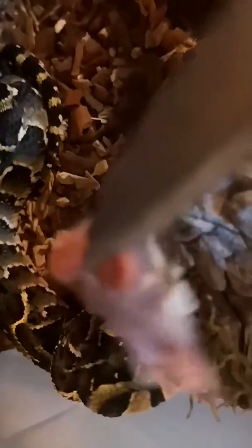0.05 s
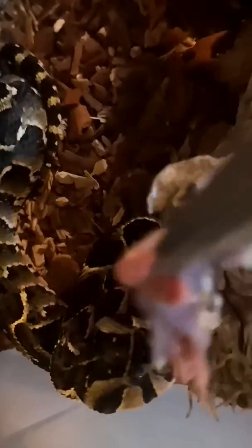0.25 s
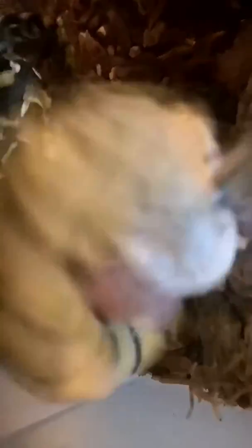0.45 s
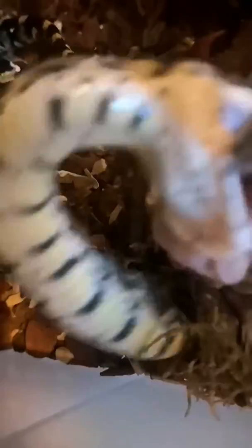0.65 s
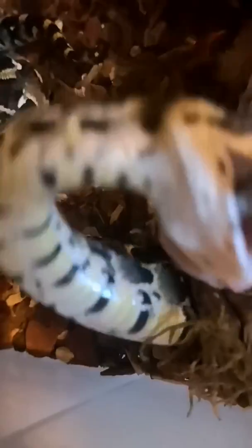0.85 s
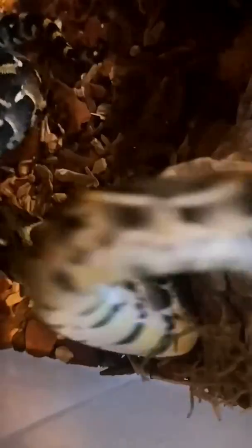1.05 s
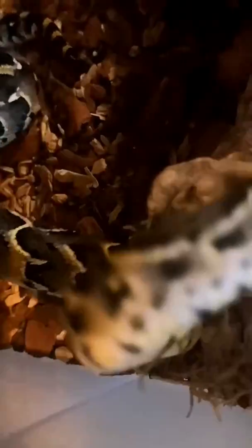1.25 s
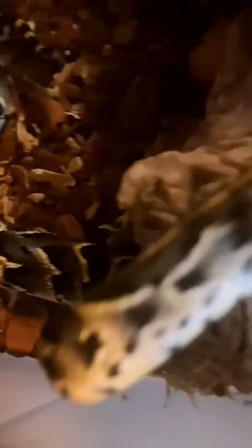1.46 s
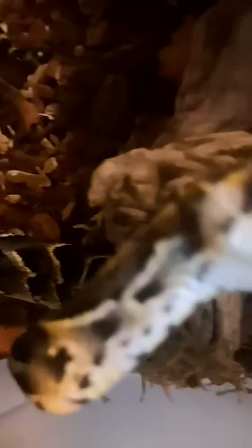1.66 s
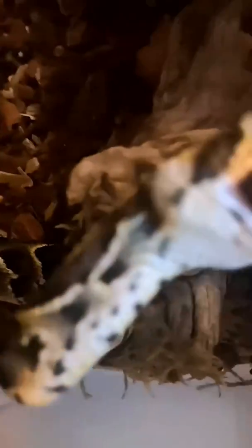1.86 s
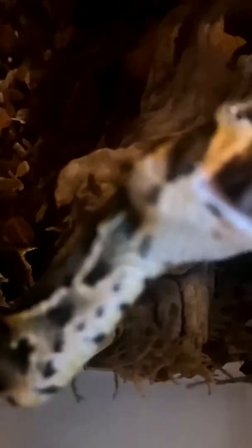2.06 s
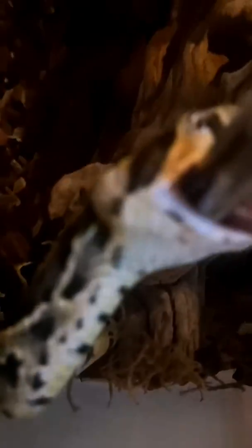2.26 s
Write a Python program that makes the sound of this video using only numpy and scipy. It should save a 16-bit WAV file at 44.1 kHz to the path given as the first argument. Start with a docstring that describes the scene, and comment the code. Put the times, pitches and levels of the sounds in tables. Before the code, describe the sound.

One quick, crisp rustle with soft thuds as a snake strikes, over a faint hum.

```python
"""Snake lunging over bark chips

A snake lunges across its enclosure, close by on the left: a quarter second of crackling rustle,
with dull thumps of its body on the floor. A few chips settle and its scales slide softly afterwards.
Behind it a motor hums with a slow beat, air hisses, and there are faint chirps, perhaps of far birds."""
import sys
import numpy as np
from scipy import signal
from scipy.fft import rfft, irfft, next_fast_len
from scipy.io import wavfile
from scipy.ndimage import map_coordinates

SR = 44100
rng = np.random.default_rng(int(sys.argv[2]) if len(sys.argv) > 2 else 0)


def output_pcm(signal):
    """Save a mono or channel-first signal as 16-bit PCM at the path in sys.argv[1].

    Samples are clipped to [-1, 1] before scaling.
    """
    pcm = np.clip(np.atleast_2d(signal).T, -1, 1) * 32767
    wavfile.write(sys.argv[1], SR, np.round(pcm).astype(np.int16))


N = 105840
TIME = np.arange(N) / SR


def amp(db):
    """Decibels to gain."""
    return 10 ** (np.asarray(db) / 20)


def unit(x):
    """Scale to rms 1."""
    return x / np.sqrt(np.mean(x ** 2) + 1e-20)


def along(points, hz):
    """Read a curve on a log frequency axis."""
    freqs, values = np.transpose(points)
    return np.interp(np.log(hz + 1), np.log(freqs + 1), values)


def envelope(points):
    """Gain from a level curve, fading 260 dB a second outside its ends."""
    times, db = np.transpose(points)
    outside = np.abs(TIME - np.clip(TIME, times[0], times[-1]))
    return amp(np.interp(TIME, times, db) - 260 * outside)


def swell(peak_s, half_s):
    """A bell-shaped fade in and out."""
    return np.exp(-.5 * ((TIME - peak_s) / half_s) ** 2)


def wobble(knots_per_s):
    """A smooth random curve."""
    return map_coordinates(rng.standard_normal(4096), [TIME * knots_per_s], mode="wrap")


def filtered(x, response):
    """EQ x with a function of frequency."""
    size = next_fast_len(N + SR // 4)
    return irfft(rfft(x, size) * response(np.fft.rfftfreq(size, 1 / SR)), size)[..., :N]


def noise():
    """Two unrelated white noises."""
    return rng.standard_normal((2, N))


def coloured(pair, eq, image):
    """Turn two unrelated signals into stereo of rms 1 with this EQ and left-right correlation."""
    def response(hz):
        width = np.arccos(along(image, hz)) / 2
        return amp(along(eq, hz)) * [np.cos(width), np.sin(width)]
    mid, side = filtered(pair, response)
    return unit(np.array([mid + side, mid - side]))


# Tone of the air hiss (frequency [Hz], gain [dB])
HISS_EQ = [(180, -20), (300, -3.5), (348, -8), (372, -13), (500, -21), (526, -46), (580, -16), (768, -19.5),
           (821, -17), (1200, -18), (1870, -14), (4270, -28.5), (5560, -27), (15500, -43.5)]
# Tone of the room drone (frequency [Hz], gain [dB])
DRONE_EQ = [(12, -2), (30, -1.5), (65, 0.5), (90, -7), (120, -13.5), (215, -6.5), (300, -19), (450, -20),
            (900, -53)]
# Room image, centred lows and wide highs (frequency [Hz], left-right correlation [-1..1])
ROOM_IMAGE = [(60, 0.98), (130, 0.98), (290, 0.19), (640, -0.36), (1410, 0.058), (3100, 0.033),
              (7000, -0.063)]


def air(hiss_db=-67, drone_db=-56, lean_right_db=.95):
    """The bed: a steady hiss of moving air over the low drone of the room."""
    pan = amp([[-lean_right_db / 2], [lean_right_db / 2]])
    hiss = pan * coloured(noise(), HISS_EQ, ROOM_IMAGE)
    drone = coloured(noise(), DRONE_EQ, ROOM_IMAGE)
    return amp(hiss_db) * hiss + amp(drone_db) * drone


# Motor partials (multiple of the shaft rate [x], level [dB], beat depth [0..1])
MOTOR_PARTIALS = [(1, -60.5, 0.2), (2, -58.5, 0.89), (4, -66.5, .85), (5, -63.5, 0.98), (7, -80.5, 0.15)]


def motor_hum(shaft_hz=49.13, beat_hz=2.844, beat_peak_s=1.2745, wander_rad=.073):
    """Harmonics of a motor shaft swell and sink together in a slow beat."""
    beat = np.cos(2 * np.pi * beat_hz * (TIME - beat_peak_s))
    out = np.zeros(N)
    for multiple, db, depth in MOTOR_PARTIALS:
        phase = 2 * np.pi * (multiple * shaft_hz * TIME + rng.random()) + wander_rad * wobble(7.49)
        out += amp(db) * np.sqrt(2 * (1 + depth * beat)) * np.sin(phase)
    return out


# Chirp cues (peak time [s], pitch [Hz], glide [Hz/s], relative level [dB], half length [s])
CHIRP_CUES = [(.325, 2520, 1500, -69, .025), (.49, 2380, -800, -61, .06), (.635, 5380, 0, -68, .03),
              (.653, 2250, -1800, -54.5, .016), (.69, 2140, -1000, -66, .042),
              (1.395, 5330, 1500, -76, .047), (2.21, 5400, 0, -73.5, .025)]


def far_chirps(blur_hz=340):
    """Thin distant whistles; a random flutter stands for the blur of their echoes."""
    out = np.zeros((2, N))
    for peak_s, hz, glide, db, half_s in CHIRP_CUES:
        age = TIME - peak_s
        tone = np.exp(2j * np.pi * (hz + glide * age / 2) * age)
        blur = np.array([wobble(blur_hz) + 1j * wobble(blur_hz) for ear in range(2)])
        out += amp(db) * swell(peak_s, half_s) * (tone * blur).real
    return out


# Slide cues (peak time [s], level [dB], half length [s])
SLIDE_CUES = [(.05, -80, 0.011), (.155, -77.5, .018), (0.796, -73.5, 0.019), (0.97, -81.5, .02),
              (1.135, -73.5, 0.027), (2.1, -80, 0.0084)]
# Sheen of the scales (frequency [Hz], gain [dB])
SCALE_EQ = [(3000, -17), (6500, 0), (8200, -7), (9600, 2), (11500, -10.5), (15000, -11)]
# Image of slides, rumble and rustle (frequency [Hz], left-right correlation [-1..1])
FLOOR_IMAGE = [(60, 1), (130, 0.69), (290, 0.024), (640, -0.89), (1400, 0.22), (7000, 0.049)]


def scale_slides():
    """Brief high whispers of sliding scales."""
    gain = sum(amp(db) * swell(peak_s, half_s) for peak_s, db, half_s in SLIDE_CUES)
    return gain * coloured(noise(), SCALE_EQ, FLOOR_IMAGE)


# Body hits on the floor (time [s], pitch [Hz], level [dB], attack [s])
BODY_HITS = [(.3912, 170, -24.5, .0068), (.408, 150, -38, .016), (.4335, 85, -31.5, .021),
             (.4513, 232, -32, .0085), (.467, 190, -39, .009), (.501, 40, -32, .022),
             (.527, 222, -34, .011)]
# Envelope of the floor rumble (time [s], level [dB])
RUMBLE_ENVELOPE = [(.33, -73), (.37, -40.5), (.44, -40.5), (.52, -38.5), (.58, -48.5), (.68, -52.5),
                   (.73, -66)]
# Low weight of the rumble (frequency [Hz], gain [dB])
RUMBLE_EQ = [(12, -9), (35, 1), (88, -0.5), (118, -10.5), (150, -10.5), (250, -4), (295, -21), (700, -53)]


def body_thumps(sharpness=2.6):
    """Soft heavy contacts make the floor boom briefly over a rumble."""
    booms = np.zeros(N)
    for start, hz, db, attack in BODY_HITS:
        age = np.maximum(TIME - start, 0)
        pulse = (age / attack * np.exp(1 - age / attack)) ** sharpness
        booms += amp(db) * pulse * np.sin(2 * np.pi * hz * age)
    return booms + envelope(RUMBLE_ENVELOPE) * coloured(noise(), RUMBLE_EQ, FLOOR_IMAGE)


def wall_reverb(x, t60_s=.18, wet_db=-5):
    """The enclosure's walls add a short tail."""
    t = TIME[:SR // 3]
    tail = rng.standard_normal((2, len(t))) * amp(-60 * t / t60_s)
    tail /= np.linalg.norm(tail[0])
    return x + amp(wet_db) * signal.fftconvolve(x, tail, axes=1)[:, :N]


# Snap accents (time [s], relative level [dB], pitch [Hz], 60 dB decay [s])
SNAP_CUES = [(0.3403, -58, 12600, .012), (0.342, -53, 12500, .012), (0.3497, -48, 7940, 0.0086),
             (0.3644, -40.5, 5560, .018), (0.3773, -44, 7640, .025), (0.3817, -45, 3430, 0.022),
             (0.4141, -45.5, 2370, 0.017), (0.4416, -43, 5300, 0.02), (0.454, -48, 2500, 0.018),
             (.5252, -41, 4170, 0.0056), (.541, -46, 2010, 0.018), (0.646, -66, 8900, 0.02),
             (0.684, -63.5, 6260, 0.025), (0.756, -60.5, 4370, 0.027), (.855, -68, 4440, .03)]


def chip_snaps(width_octaves=.56, trim_db=-3):
    """Single chips crack, each a short noise burst around its own pitch."""
    out = np.zeros((2, N))
    for start, db, hz, t60 in SNAP_CUES:
        age = TIME - start
        band = lambda f: np.exp(-.5 * (np.log2((f + 1) / hz) / width_octaves) ** 2)
        decay = (age >= 0) * amp(db + trim_db - 60 * np.abs(age) / t60)
        out += decay * unit(filtered(noise(), band))
    return out


def chip_texture(centre_hz, grains_per_s=3000, ring_cycles=2.5, spread_db=3.5, rub_share=.45):
    """Dense clumps of tiny bark contacts, each a few cycles long, over the noise of rubbing."""
    rub, t = noise(), TIME[:128]
    when, pitch, force, polarity = rng.random((int(grains_per_s * N / SR), 4)).T[:, :, None]
    hz = centre_hz * 2 ** (3 * (pitch - .5))  # scattered over three octaves
    size = amp(-spread_db * np.log(np.maximum(force, .01))) * np.sign(polarity - .5)
    grains = size * np.sin(2 * np.pi * hz * t) * np.exp(-np.pi * hz * t / ring_cycles)
    at = (when * 2 * N).astype(int) + np.arange(len(t))  # one long strip, cut into a pair
    contacts = np.bincount(at.ravel(), grains.ravel(), 2 * N)[:2 * N].reshape(2, N)
    clumps = amp(2 * wobble(knots_per_s=280))
    return clumps * (np.sqrt(1 - rub_share) * unit(contacts) + np.sqrt(rub_share) * rub)


# Envelope of the crisp crackle (time [s], relative level [dB])
CRACKLE_ENVELOPE = [(.328, -90), (.342, -66.5), (.362, -55.5), (.379, -51.5), (.391, -60.5), (.413, -50.5),
                    (.435, -55.5), (.444, -50.5), (.493, -58), (.527, -51), (.559, -61.5), (.615, -68.5),
                    (.645, -65), (.669, -74), (.73, -74)]
# Bite of the crackle (frequency [Hz], gain [dB])
CRACKLE_EQ = [(600, -19), (1500, -1.5), (2200, -3), (3500, -10.5), (5500, 3), (7000, 1.5), (9300, 0.5),
              (10300, -1.5), (14800, -11), (15600, -20)]
# Envelope of the duller crunch (time [s], relative level [dB])
CRUNCH_ENVELOPE = [(0.33, -96), (0.346, -89), (0.354, -65.5), (0.384, -55.5), (0.404, -64.5), (0.434, -69),
                   (0.442, -56.5), (0.47, -57), (0.488, -61), (0.526, -54), (0.628, -72.5), (0.7, -79)]
# Body of the crunch (frequency [Hz], gain [dB])
CRUNCH_EQ = [(200, -9), (350, 5.5), (490, 0), (700, -5), (900, -0.5), (1700, 2.5), (2600, 2.5), (7000, -13)]
# Boxy ring of the enclosure (frequency [Hz], bandwidth [Hz], boost [dB])
ENCLOSURE_MODES = [(510, 25, 11), (712, 36, 14.5), (890, 50, 8.5), (1110, 25, 2), (1216, 60, 6),
                   (1340, 45, 1), (2130, 27, 5.5), (2260, 52, 2)]


def rustle(crackle_db=-2.3, crunch_db=3):
    """The body ploughs through chips: crisp on top, duller under its weight; the enclosure rings."""
    crackle = envelope(CRACKLE_ENVELOPE) * coloured(chip_texture(centre_hz=5000), CRACKLE_EQ, FLOOR_IMAGE)
    crunch = envelope(CRUNCH_ENVELOPE) * coloured(chip_texture(centre_hz=1250), CRUNCH_EQ, FLOOR_IMAGE)

    def ring(f):
        return 1 + sum((amp(db) - 1) * 1j * f * width / (hz * hz - f * f + 1j * f * width)
                       for hz, width, db in ENCLOSURE_MODES)
    return filtered(amp(crackle_db) * crackle + amp(crunch_db) * crunch, ring)


# The snake's place on the left (frequency [Hz], left minus right [dB])
LUNGE_PAN = [(250, 3), (450, 4), (700, 2.5), (950, 10), (1700, 0.5), (2100, 12.5), (2500, 9), (3300, 9.5),
             (5500, 4.5), (7500, 4.5), (8600, 10.5), (11000, 3), (15000, 5)]


def lunge():
    """The hero sound: rustling and snapping chips, panned left."""
    pan = lambda hz: amp(along(LUNGE_PAN, hz) * np.array([[.5], [-.5]]))
    return filtered(rustle() + wall_reverb(chip_snaps()), pan)


def scene():
    """The snake up front, the room all around."""
    return lunge() + body_thumps() + scale_slides() + far_chirps() + motor_hum() + air()


def record(dry):
    """A brick-wall high cut on the mix."""
    return filtered(dry, lambda hz: hz < 15600)


dry = scene()
out = record(dry)
output_pcm(out)
```